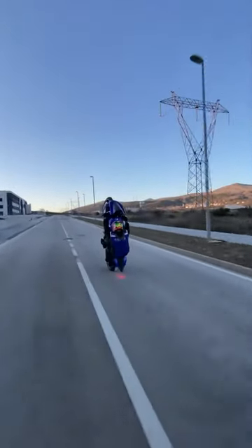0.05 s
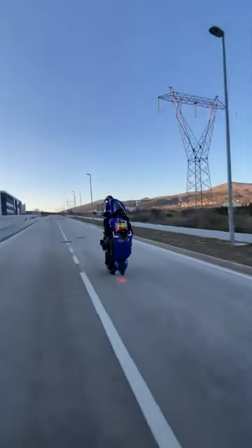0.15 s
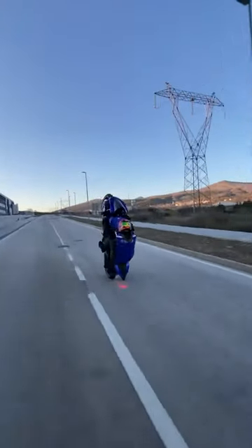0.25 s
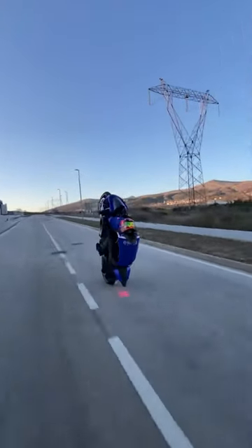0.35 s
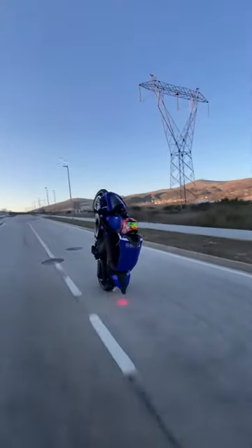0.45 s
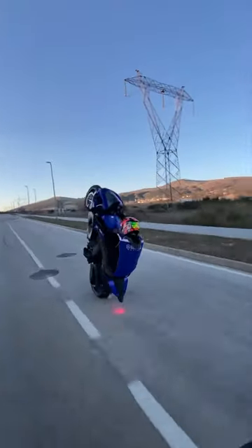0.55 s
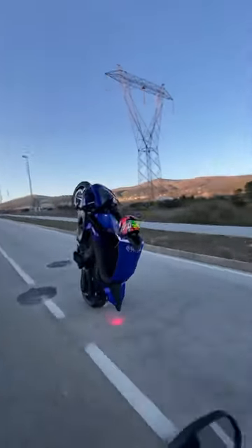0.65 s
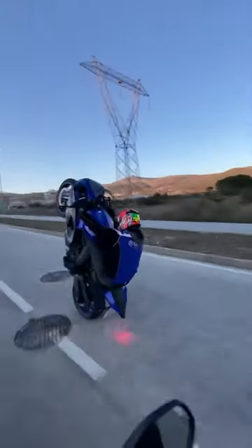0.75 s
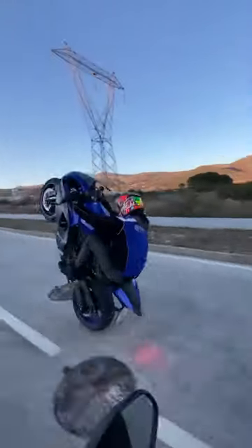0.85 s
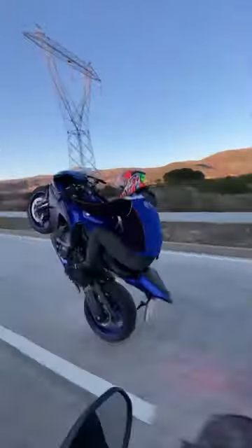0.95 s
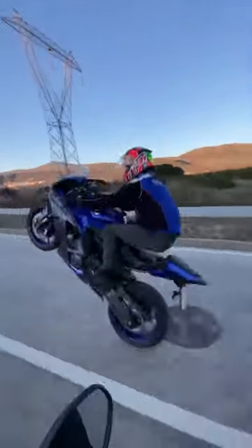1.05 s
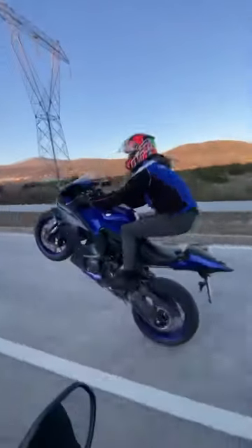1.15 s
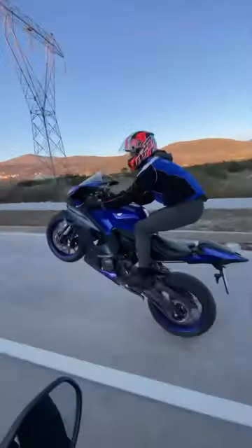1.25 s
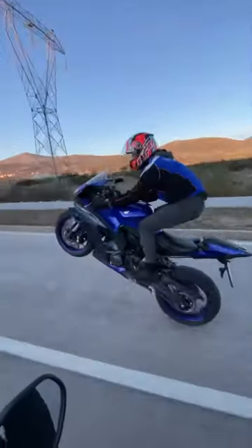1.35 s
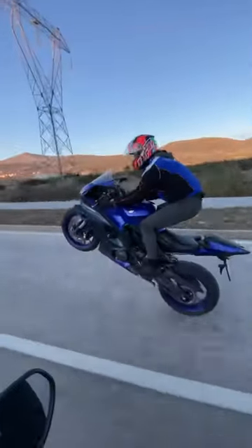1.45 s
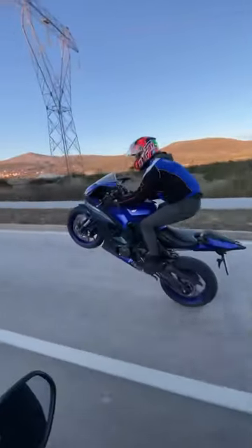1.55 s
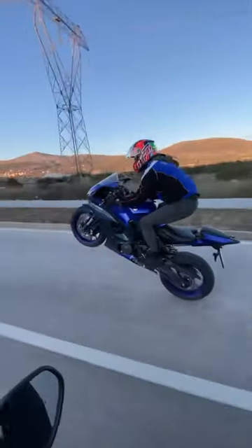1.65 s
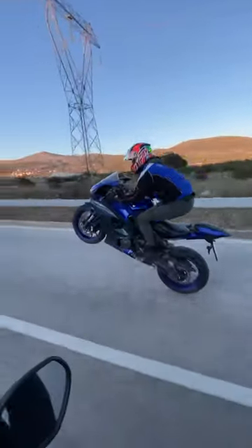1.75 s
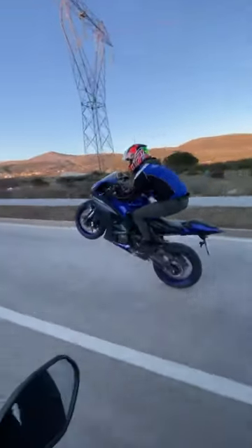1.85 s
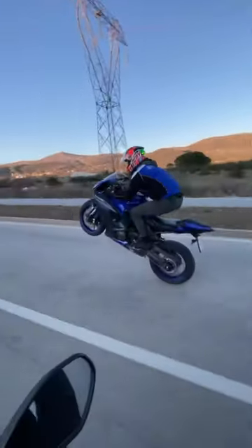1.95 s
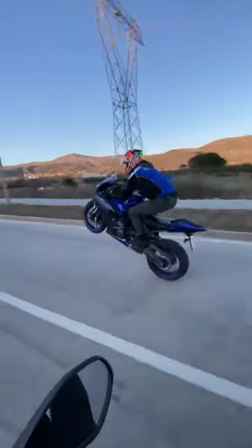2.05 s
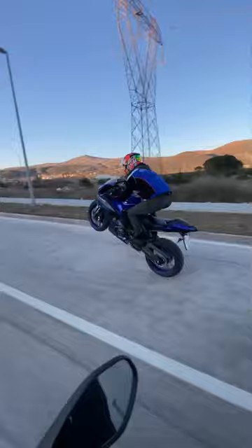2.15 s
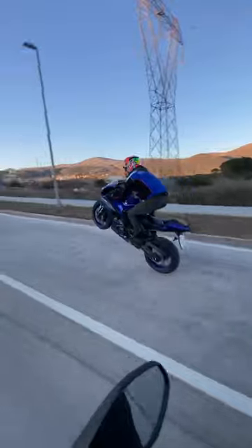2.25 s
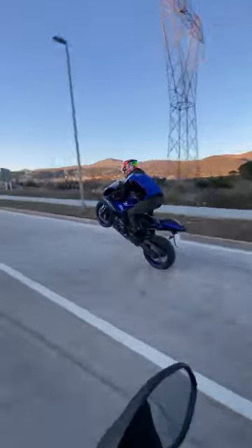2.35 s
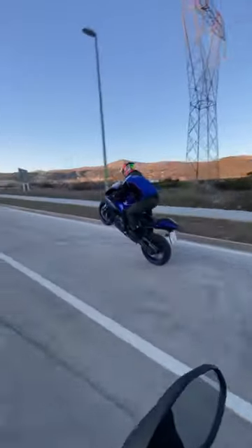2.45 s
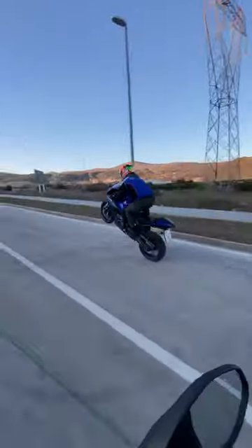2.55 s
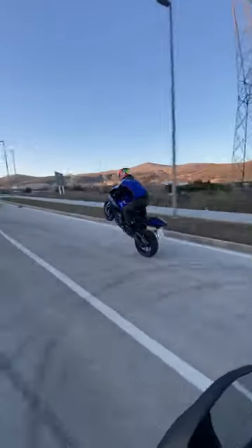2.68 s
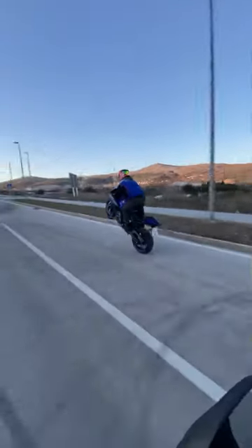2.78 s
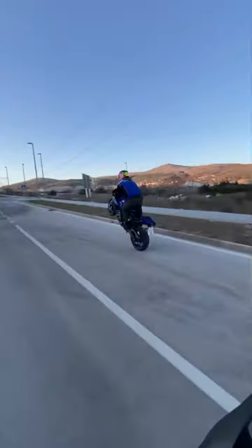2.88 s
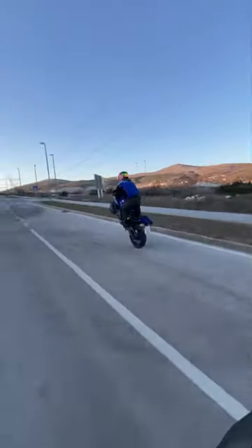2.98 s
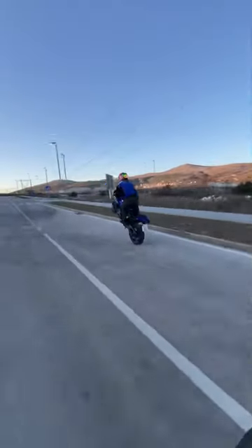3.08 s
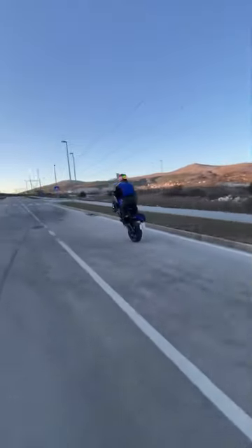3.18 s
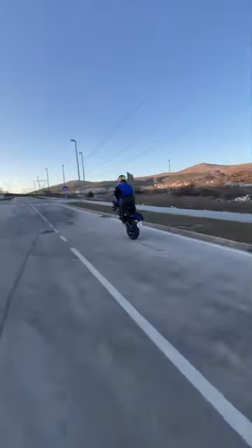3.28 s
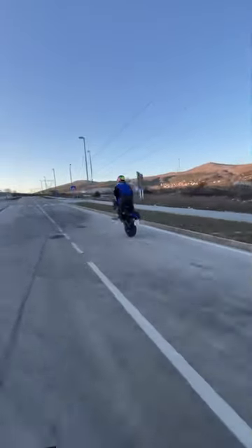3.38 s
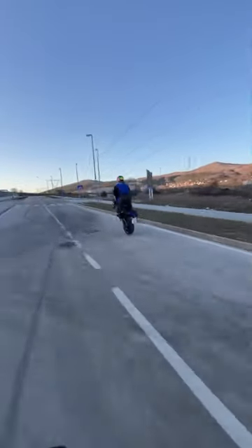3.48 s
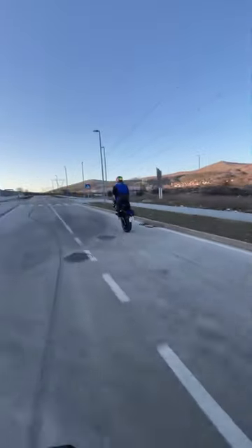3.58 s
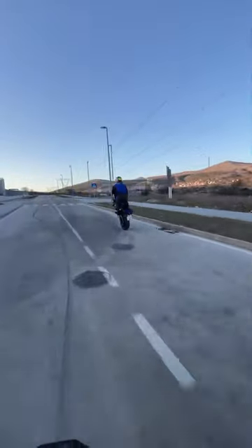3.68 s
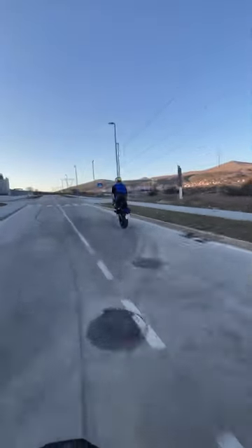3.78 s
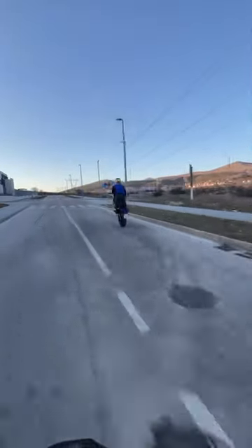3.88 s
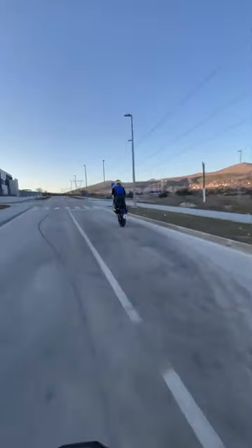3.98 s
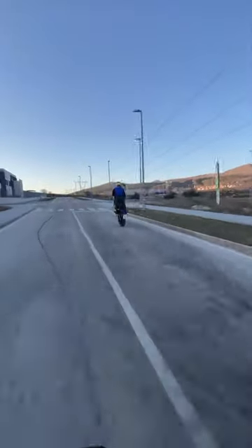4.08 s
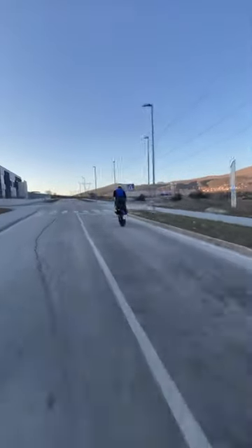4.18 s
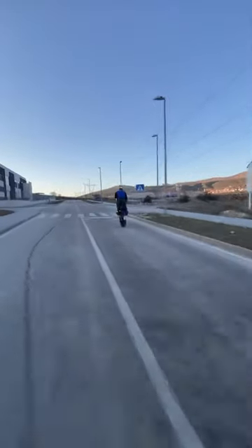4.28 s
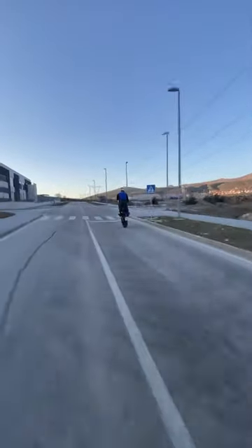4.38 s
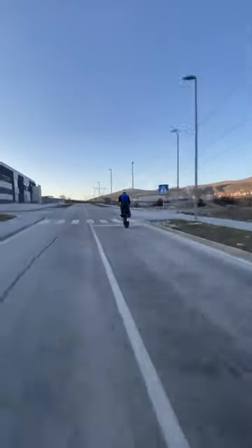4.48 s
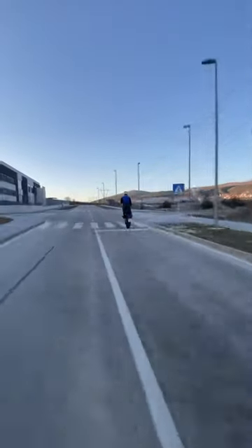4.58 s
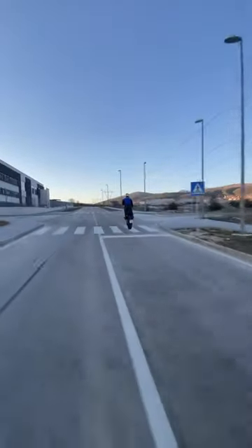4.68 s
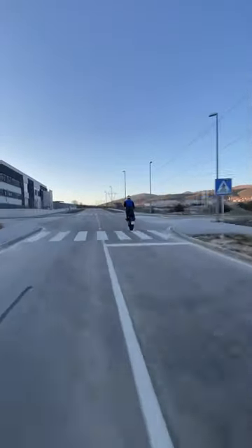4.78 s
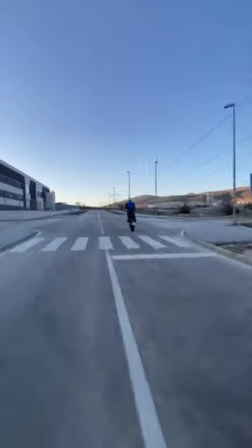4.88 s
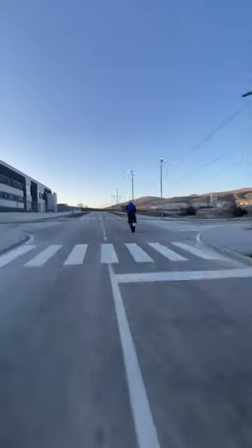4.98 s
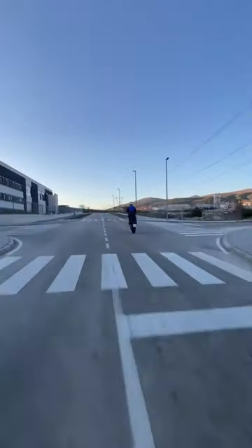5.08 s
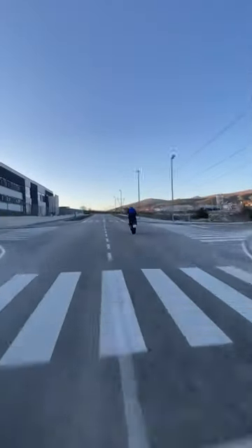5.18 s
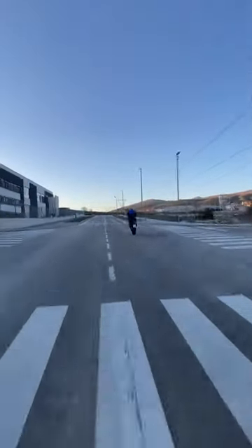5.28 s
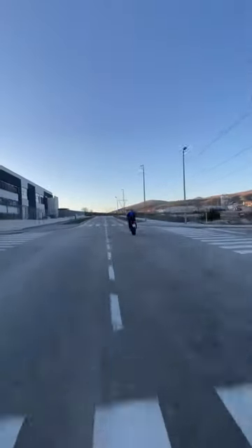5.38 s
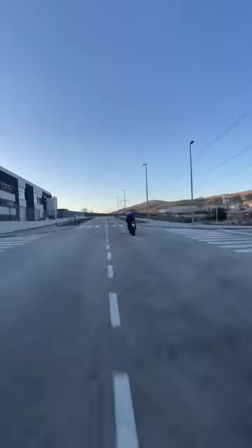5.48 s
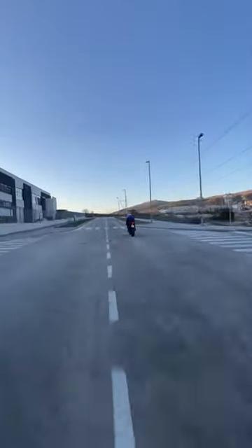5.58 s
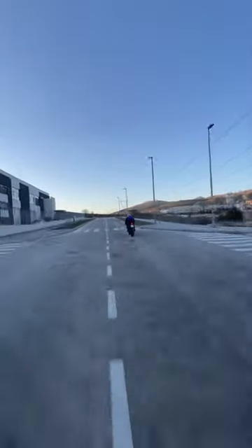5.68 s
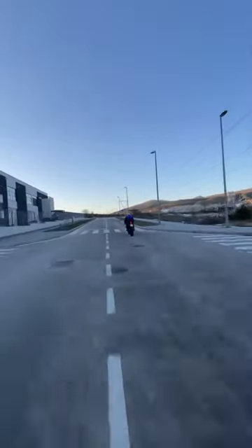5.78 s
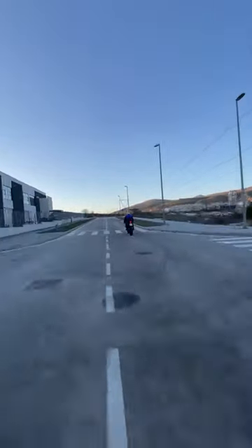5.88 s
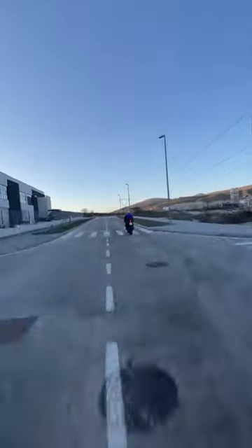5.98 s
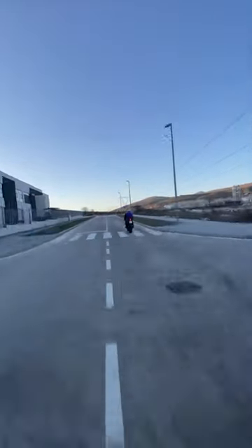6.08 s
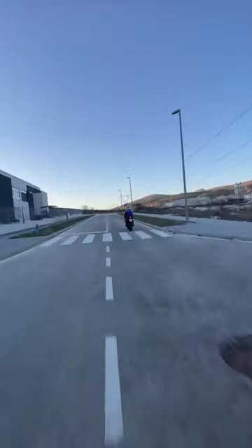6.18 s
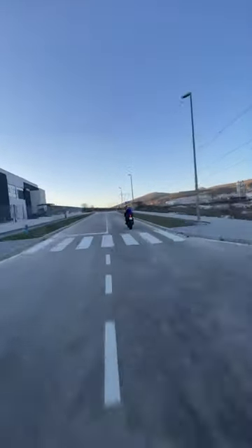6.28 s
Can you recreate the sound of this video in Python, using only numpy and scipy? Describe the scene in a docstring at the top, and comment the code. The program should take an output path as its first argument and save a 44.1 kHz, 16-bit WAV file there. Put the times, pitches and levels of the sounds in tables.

```python
"""Motorcycle ride in gusty wind

A camera rides on a motorcycle; shaped noise with short bursts is the wind on its microphone ports.
Noise opposite in left and right comes in short bursts; engines are sums of multiples that rev up:
the rider's pulls up through a gear, a second bike revs ahead, roar and clatter throb with the first.
A loose metal part jingles as decaying modes. The camera takes its bass from one centre port
and its treble from a left-right pair."""
import sys
import numpy as np
from scipy import signal
from scipy.fft import irfft
from scipy.io import wavfile
from scipy.ndimage import uniform_filter1d

SR = 44100
rng = np.random.default_rng(int(sys.argv[2]) if len(sys.argv) > 2 else 0)


def waveform_to_disk(signal):
    """Save audio, clipped to [-1, 1], as 16-bit WAV at the path in sys.argv[1]."""
    frames = np.transpose(np.atleast_2d(signal))
    scaled = np.clip(frames, -1, 1) * 32767
    samples = np.round(scaled).astype(np.int16)
    wavfile.write(sys.argv[1], SR, samples)


def invert_db(level):
    """Linear amplitude ratio for a level in decibels (20 dB per decade), elementwise."""
    return 10 ** (np.asarray(level, dtype=float) / 20)


N = 279594  # length in samples

# Treble hiss of the air stream, spectrum shape: freq_hz, density_db
HISS_SPECTRUM = [(2500, -15.5), (4500, 0), (5500, 1.5), (6500, -6.5), (8000, -11), (10500, -6),
                 (12000, -9.5), (13500, -23.5), (15500, -35.5)]
# Treble hiss level: time_s, level_db
HISS_LEVEL = [(0, -38), (1.5, -42.5), (2.3, -42.5), (3, -44), (3.8, -44), (4.5, -44.5), (5.4, -40.5),
              (6.34, -50)]

# Low pressure swings, spectrum shape: freq_hz, density_db
RUMBLE_SPECTRUM = [(15, -50), (28, -23.5), (40, -7), (52, 8.5), (72, 1), (120, -4.5), (300, -14.5),
                   (420, -43)]
# Low pressure swings, level before thuds: time_s, level_db
RUMBLE_LEVEL = [(0, -28), (.9, -24), (1.16, -30.5), (1.35, -38.5), (2.06, -29), (2.5, -36.5), (3, -31.5),
                (3.9, -33.5), (4.7, -30.5), (5.85, -26), (6.05, -23.5), (6.34, -24)]
# Heavy thuds of air: centre_s, half_length_s, rise_db
THUDS = [(0.557, 0.092, 8), (0.924, 0.039, 7.5), (3.082, 0.071, 7.5), (3.424, 0.1, 8), (4.459, 0.065, 4)]

# Noise opposite in left and right, spectrum shape: freq_hz, density_db
OPPOSED_SPECTRUM = [(700, 2.5), (1100, 4.5), (1600, -7), (2500, -10), (3300, -13.5), (4200, -22),
                    (6000, -28), (8000, -32), (10000, -44), (15000, -69)]
# Opposed noise, level between bursts: time_s, level_db
OPPOSED_LEVEL = [(0, -33.5), (.47, -31), (.5, -22), (.62, -23), (.76, -28), (.79, -34), (.88, -29),
                 (.92, -21.5), (1.15, -26), (1.2, -29.5), (1.45, -30), (2.05, -29), (2.12, -38), (2.7, -41),
                 (3, -33.5), (3.14, -32), (3.2, -47), (4.3, -48.5), (5.2, -44.5), (6.34, -39)]
# Opposed noise, phase lead of left over right: freq_hz, lead_rad
OPPOSED_LEAD = [(1400, np.pi), (2100, 2.5), (8000, 2.5)]
# Short bursts of noise, opposite in left and right: centre_s, rise_db
SIDE_BURSTS = [(.034, 10), (.066, 10), (.153, 11), (.194, 9), (.292, 9), (.489, 7), (.606, 6), (.902, 11),
               (.928, 6), (1.018, 6), (1.083, 8), (1.115, 8), (1.14, 9), (1.234, 10), (1.31, 8), (1.447, 7),
               (1.56, 8), (1.73, 8), (1.812, 6), (1.849, 7), (1.987, 8), (2.018, 7), (2.076, 8), (2.161, 8),
               (2.202, 9), (2.293, 11), (2.392, 7), (2.502, 11), (2.541, 8), (2.584, 10), (2.626, 9),
               (2.682, 10), (2.757, 8), (2.81, 8), (2.843, 11), (2.889, 8), (2.938, 6), (3.021, 7),
               (3.108, 10), (3.195, 14), (3.31, 11), (3.602, 11), (3.947, 12), (4.062, 15), (4.109, 11),
               (4.154, 11), (4.227, 13), (4.36, 10), (4.73, 11), (5.183, 11), (5.801, 10)]

# Wind strength before the side offset and bursts: time_s, centre_port_db, side_ports_db
GUSTS = [(0, -28, -31.5), (.45, -27, -26), (.55, -24, -30), (.66, -26, -27), (.74, -33, -27.5),
         (.8, -36.5, -45.5), (.87, -32, -30), (.925, -26, -25), (.96, -26.5, -26), (.985, -18.5, -16.5),
         (1.06, -22.5, -21), (1.14, -23.5, -22.5), (1.19, -26.5, -24.5), (1.55, -27.5, -27),
         (2.02, -26, -24.5), (2.035, -38, -32.5), (2.055, -27.5, -30), (2.15, -43.5, -40.5),
         (2.45, -42, -37.5), (2.64, -35.5, -41), (2.7, -32, -32.5), (2.9, -29.5, -30.5), (3.03, -28, -31),
         (3.06, -26, -32.5), (3.135, -24, -30), (3.16, -31.5, -36.5), (3.4, -34, -37), (3.9, -39.5, -40.5),
         (4.2, -33.5, -40), (4.65, -37.5, -40), (4.95, -30, -32), (5.2, -33, -36.5), (5.7, -27, -29.5),
         (6.15, -28.5, -33.5), (6.34, -36, -33.5)]
# Strongest eddies on the ports: centre_s, half_length_s, centre_rise_db, side_rise_db
EDDIES = [(0.036, 0.0035, 6.5, 12), (0.119, 0.005, 9.5, 6.5), (.173, 0.0057, 2, 9),
          (0.356, 0.0022, -2, 2.5), (0.684, 0.007, 15, 6), (0.891, 0.0028, 9.5, 10.5),
          (0.902, 0.0069, 11.5, 15), (.943, 0.007, 9.5, 14.5), (1.015, .005, 2, 1.5),
          (1.14, 0.0054, 2.5, 12.5), (1.234, 0.007, 0.5, 7), (1.718, 0.0043, 4, 5), (1.806, 0.012, 2, 6.5),
          (1.881, 0.0035, 6.5, 5), (2.016, 0.0047, 9.5, 3), (2.077, .012, 6.5, 8.5), (2.121, 0.0046, 10, 4),
          (2.197, 0.02, 11, 8.5), (2.268, 0.0074, 14, 9), (2.289, 0.01, 22, 14), (2.557, 0.0096, 3, -7),
          (2.847, 0.015, -1, 6.5), (3.099, 0.013, 1.5, 7), (3.394, 0.0034, 11.5, 9.5), (4.484, 0.031, 6, 4),
          (5.383, 0.051, 3, 3.5)]
# State of the air flow: time_s, stereo_edge_hz, smoothness_0_to_1, side_port_likeness_0_to_1
FLOW = [(0, 1000, 0, .75), (.6, 1100, 0, .92), (.9, 1200, 0, .8), (2.2, 1220, 0, .8), (3.1, 1170, 0, .8),
        (3.5, 1130, .5, .7), (4.2, 1120, .67, .7), (4.5, 1000, .75, .85), (4.8, 820, .83, .96),
        (5.2, 610, 1, .996), (5.85, 610, 1, .996), (6.34, 780, 1, .996)]
# Wind spectrum shape in ragged flow: freq_hz, density_db
WIND_SPECTRUM = [(40, -23), (170, -1), (300, -2.5), (600, -1), (900, 0.5), (1250, 1.5), (1700, -6),
                 (2500, -10.5), (3300, -16.5), (4200, -19.5), (5500, -25), (7500, -34), (10000, -44.5),
                 (15000, -74.5)]
# Phase lead of left over right in fully smooth flow, and for the hiss: freq_hz, lead_rad
WIND_LEAD = [(1400, np.pi), (2000, 1.03), (2900, 2.67), (4400, 1.77), (5000, 4.16), (5600, 1.9),
             (6400, 0.94), (7700, 2.36), (8600, 1.5)]
# Wind moaning across an edge: centre_s, half_length_s, freq_hz, half_width_hz, rise_db
MOANS = [(.05, .04, 1650, 250, 7), (.6, .12, 1900, 230, 10), (.74, .03, 2200, 150, 8),
         (1.95, .08, 2100, 350, 4)]

# Knocks of the loose metal part: start_s, level_db
JINGLE_KNOCKS = [(.502, -30.5), (.521, -32.5), (.534, -35), (.548, -34), (.565, -38), (.58, -41),
                 (.606, -37), (.617, -38)]
# Its modes, level before a random gain: freq_hz, level_db, t60_s
JINGLE_MODES = [(5630, -8, .025), (8020, -2, .04), (8300, -3, .035), (8600, -5, .02), (9100, -8, .015),
                (10100, -12, .012)]

# Bike ahead, exhaust: time_s, level_db, throttle_0_to_1
AHEAD = [(0, -31.5, 0.01), (.55, -35, 0.2), (.9, -29.5, 0.6), (1.099, -29, 1), (2, -38, 0.7),
         (2.5, -38, 0.9), (3, -38, 0.6), (4.3, -44.5, 0.73)]
# Bike ahead, tone at multiple 1: time_s, pitch_hz
AHEAD_HZ = [(0, 73), (.6, 73), (1.1, 76), (1.5, 85), (2, 101.5), (2.5, 115.5), (3, 127.5), (3.5, 133),
            (4.3, 139.5)]
# Bike ahead, exhaust tones: multiple, pulling_db, coasting_db
AHEAD_TONES = [(1, 2, -8), (1.5, -12, 2), (2, -17.5, -13), (2.5, -14.5, -2.5)]

# Engine clatter and tyre roar, level of the hiss before its throb: time_s, level_db
ROAR_LEVEL = [(0, -32), (.6, -39), (.82, -46), (.95, -39), (1.8, -43), (2.4, -47.5), (3.2, -37),
              (3.9, -37.5), (4.4, -35.5), (4.9, -31), (5.4, -27), (5.6, -28), (5.9, -28.5), (6.34, -30.5)]
# Roar spectrum shape, also shapes the clatter: freq_hz, density_db
ROAR_SPECTRUM = [(950, -41), (1300, -2.5), (2100, -3.5), (2450, -2.5), (2720, 0.5), (2950, -3), (3230, -1),
                 (3550, -5.5), (4050, -7), (4300, -4.5), (4800, -9), (5100, -8.5), (6050, -12), (8000, -18),
                 (10000, -18.5), (12000, -34.5), (15000, -48.5)]
# Roar phase lead of left over right: freq_hz, lead_rad
ROAR_LEAD = [(1400, 3.5), (2070, -1), (2450, 2), (2800, 0.54), (3190, -1), (4390, -3), (5000, -5),
             (5600, -4), (8000, -3.5), (8600, -3)]
# Roar and clatter balance: freq_hz, left_minus_right_db
ROAR_BALANCE = [(1600, 5.5), (2100, -6), (2700, -5), (4000, -2), (4700, -4.5), (6400, -3.5), (7500, 1)]
# Clatter phase lead of left over right: freq_hz, lead_rad
CLATTER_LEAD = [(1400, np.pi), (1900, 0.69), (3500, 1), (5000, 2.9)]
# Gear and chain whine, line level before the roar spectrum: cycle_multiple, line_db
WHINE = [(20, 4), (22, 8), (46, 11), (48, 7), (56, 11), (65, 7), (75, 14), (78, 8), (92, 12)]

# Own engine, exhaust: time_s, level_db, throttle_0_to_1
ENGINE = [(2.2, -46, 1), (2.7, -41, 1), (3.1, -40, 1), (3.5, -40.5, 1), (4.3, -39.5, 1), (4.6, -37, 1),
          (4.9, -34, 1), (5.25, -31, 1), (5.47, -32, 1), (5.56, -33, 0), (5.9, -34, 0), (6.33, -32, 0)]
# Own engine speed: time_s, cycle_hz
ENGINE_HZ = [(2.2, 27.69), (2.45, 29.5), (2.7, 30.3), (3.1, 32.1), (3.5, 33.9), (3.9, 35.5), (4.3, 36.9),
             (4.6, 39.2), (4.9, 41.75), (5.25, 45.25), (5.45, 47.1), (5.65, 48.3), (5.9, 48.7),
             (6.33, 48.09)]
# Own exhaust tones before the silencer resonance: cycle_multiple, pulling_db, coasting_db
ENGINE_TONES = [(1, -9, -2), (2, -1, -1), (3, -1, -2), (4, -7, -11), (5, 2.5, -12), (6, -10, -9),
                (7, -14, -16), (8, -11, -12), (9, -9, -12), (10, -12, -14), (11, -9, -13), (12, -11, -15),
                (13, -8, -18), (14, -11, -18), (15, -14, -18), (16, -16, -20), (17, -21, -28)]

# Gain on what left and right share: freq_hz, gain_db
SHARED_TREBLE = [(8200, 0), (9000, -30), (12000, -30), (14000, -15)]


def evened(x):
    """Scales to rms 1."""
    return x / np.sqrt(np.mean(abs(x) ** 2) + 1e-20)


def over_hz(points, hz):
    """Reads a spectrum on a log-frequency axis, as a column."""
    f, value = np.transpose(points)
    return np.interp(np.log(hz + 1), np.log(f + 1), value)[:, None]


def over_time(rows, t):
    """Reads every column of a curve at the times t."""
    s, *columns = np.transpose(rows)
    return [np.interp(t, s, c) for c in columns]


def bins_and_frames(size):
    """Bin frequencies and frame times of short-time spectra with 75% overlap."""
    hop = size // 4
    return np.fft.rfftfreq(size, 1 / SR), np.arange(N // hop + 5) * hop / SR


def smoothed_twice(x, size):
    """Two moving averages in a row."""
    return uniform_filter1d(uniform_filter1d(x, size=size), size=size)


def lumps(shape, bins, frames):
    """Random patches of unit spread over frequency and time."""
    smeared = uniform_filter1d(rng.standard_normal(shape), bins, 0)
    return evened(uniform_filter1d(smeared, frames, 1))


def bursts(t, s, length, rise_db):
    """Sum of bell-shaped rises in dB."""
    return np.exp(-((t[:, None] - s) / length) ** 2) @ rise_db


def from_spectra(z, size):
    """Short-time spectra back to sound."""
    return signal.istft(z, nperseg=size, noverlap=size * 3 // 4)[1][:, :N]


def ports(gain, lead, likeness, size):
    """Noise at the left, right and centre port; gain is ports x bins x frames."""
    left, other, centre = rng.standard_normal((3, *gain.shape[1:], 2)) @ [1, 1j]
    same = np.clip(likeness, 0, 1)
    right = np.exp(-1j * lead) * (same * left + np.sqrt(1 - same ** 2) * other)
    return from_spectra(gain * [left, right, centre], size)


def air_hiss():
    """Patchy treble noise of air passing the helmet, alike in level at all ports."""
    hz, t = bins_and_frames(size=512)
    field = invert_db(over_hz(HISS_SPECTRUM, hz) + 5.0 * lumps((len(hz), len(t)), bins=6, frames=12))
    hiss = evened(ports(np.array([field] * 3), over_hz(WIND_LEAD, hz), 0.84, size=512))
    return hiss * invert_db(over_time(HISS_LEVEL, np.arange(N) / SR)[0])


def rumble():
    """Lumpy low pressure swings of the air stream, the same at every port, with heavy thuds."""
    hz, t = bins_and_frames(size=2048)
    field = invert_db(over_hz(RUMBLE_SPECTRUM, hz) + 2.2 * lumps((len(hz), len(t)), bins=3, frames=4))
    low = evened(ports(np.array([field] * 3), 0, 1, size=2048)[2])
    t = np.arange(N) / SR
    return low * invert_db(over_time(RUMBLE_LEVEL, t)[0] + bursts(t, *np.transpose(THUDS)))


def opposed_noise():
    """Noise roughly opposite in left and right, in short bursts; none at the centre port."""
    burst_s, flicker_db, patch_db = .008, 1.4, 3.4
    hz, t = bins_and_frames(size=256)
    s, rise_db = np.transpose(SIDE_BURSTS)
    level = over_time(OPPOSED_LEVEL, t)[0] + bursts(t, s, burst_s, rise_db)
    level = level + flicker_db * lumps((1, len(t)), bins=1, frames=5)
    patches = patch_db * lumps((len(hz), len(t)), bins=5, frames=8)
    field = invert_db(over_hz(OPPOSED_SPECTRUM, hz) + level + patches)
    return ports(np.array([field, field, 0 * field]), over_hz(OPPOSED_LEAD, hz), .995, size=256)


def small_eddies(t):
    """Rises of lesser eddies at random times, drawn apart for centre and sides."""
    rate_per_s, length_s = 12., .003
    chance = rng.random((2, len(t)))
    size = np.minimum(rng.exponential(1, (2, len(t))), 3)
    hits = chance < rate_per_s * t[1]  # t[1] is the frame step
    return [bursts(t, t[hit], length_s, big[hit]) for hit, big in zip(hits, size)]


def wind():
    """Turbulence on the ports: ragged, with short eddies that lift all bands at once."""
    tilt_db_per_octave, ragged_db, smooth_ragged_db = -12, 3.3, 1
    small_centre_db, small_side_db, swell_db = 2.5, 3.5, 0.27
    side_offset_db = -5  # side-port level offset, fading out as flow smooths
    hz, t = bins_and_frames(size=256)
    centre_db, side_db = over_time(GUSTS, t)
    _, smooth, likeness = over_time(FLOW, t)

    # smooth flow is duller, less ragged, and thuds less
    tilt_db = tilt_db_per_octave * smooth
    ragged = np.interp(np.sqrt(smooth), [0, 1], [ragged_db, smooth_ragged_db])
    shape = over_hz(WIND_SPECTRUM, hz) + tilt_db * np.log2(np.maximum(hz, 1300) / 1300)[:, None]
    shape += 0.42 * tilt_db * np.log2(450 / np.clip(hz, 150, 450))[:, None]

    s, length, centre_rise, side_rise = np.transpose(EDDIES)
    flicker = lumps((2, len(t)), bins=1, frames=4)
    swell = swell_db * lumps((2, len(t)), bins=1, frames=40)
    small = small_eddies(t)
    centre = centre_db + bursts(t, s, length, centre_rise)
    centre += small_centre_db * small[0] + 0.62 * ragged * flicker[0] + swell[0]
    side = side_db + side_offset_db * (1 - smooth) + bursts(t, s, length, side_rise)
    side += small_side_db * small[1] + 0.75 * ragged * flicker[1] + swell[1]

    patches = 0.24 * ragged * lumps(shape.shape, bins=8, frames=8)
    for at, span, f, width, rise_db in MOANS:
        patches += rise_db * np.exp(-((hz[:, None] - f) / width) ** 2 - ((t - at) / span) ** 2)
    field = shape + patches + np.array([side, side, centre])[:, None]
    lead = over_hz(WIND_LEAD, hz) * (.35 + .65 * smooth)
    return ports(invert_db(field), lead, likeness, size=256)


def jingle():
    """Each knock is a short tick that rings the same high modes, rattling as it dies."""
    knocks, t = np.zeros(N), np.arange(3000) / SR
    lucks = rng.random((len(JINGLE_KNOCKS), len(JINGLE_MODES), 2))
    for (s, db), luck in zip(JINGLE_KNOCKS, lucks):
        ring = 0
        for (hz, mode_db, t60), (gain, phase) in zip(JINGLE_MODES, luck):
            decay = invert_db(mode_db - 60 * t / t60)
            ring = ring + decay * (1.2 + gain) * np.sin(2 * np.pi * (hz * t + phase))
        noise = rng.standard_normal((2, len(t) + 1))
        rattle = 1 + 1.9 * evened(uniform_filter1d(uniform_filter1d(noise[0, 1:], size=40), size=30))
        tick = invert_db(17 - 60 * t / .04) * np.diff(smoothed_twice(noise[1], size=3))
        onset = np.minimum(t / 0.00027, 1)
        knocks[round(s * SR):][:len(t)] += invert_db(db) * (ring * rattle * onset + tick)
    return np.array([knocks, np.roll(knocks, 2), knocks])  # right port 2 samples late


def exhaust(speed, rows, tones, wobble, rough_db):
    """Multiples of the engine's base tone, wavering in speed and strength; also returns its turns."""
    pipe_hz, pipe_width_hz, pipe_db = 530, 110, 4.5  # silencer resonance
    t = np.arange(N) / SR
    hz, level_db, throttle = over_time(speed, t) + over_time(rows, t)
    throttle = np.clip(throttle, 0, 1)
    drift, flutter = lumps((2, N), bins=1, frames=3000)
    turns = np.cumsum(hz * (1 + wobble * drift)) / SR
    tone = 0
    for k, pulling_db, coasting_db in tones:
        resonance_db = pipe_db * np.exp(-((k * hz - pipe_hz) / pipe_width_hz) ** 2)
        strength = invert_db(throttle * pulling_db + (1 - throttle) * coasting_db + resonance_db)
        tone = tone + strength * np.cos(2 * np.pi * (k * turns + .13 * k * k))
    fade_in = np.clip((t - rows[0][0] + 0.18) / 0.41, 0, 1)
    fade_out = np.clip((rows[-1][0] + 0.25 - t) / 0.2, 0, 1)
    return np.sqrt(2) * invert_db(level_db + rough_db * flutter) * fade_in * fade_out * tone, turns


def bike_ahead():
    """Exhaust of the second bike: few tones, uneven in strength."""
    return exhaust(AHEAD_HZ, AHEAD, AHEAD_TONES, wobble=.01, rough_db=3.5)[0]


def clatter(turns):
    """Valves and gears repeat nearly the same knocks in every cycle: many thin wavering lines."""
    lines = np.exp(2j * np.pi * rng.random(257)) * invert_db(4 * rng.standard_normal(257))
    lines[:18], lines[130:] = 0, 0
    k, line_db = np.transpose(WHINE)
    k = k.astype(int)
    lines[k] *= invert_db(line_db) / abs(lines[k])
    slip = .0015 * lumps((1, N), bins=1, frames=2500)[0]  # in cycles
    cycle = irfft(lines, 4096)
    knocks = np.interp((turns + slip) % 1, np.arange(4096) / 4096, cycle, period=1)

    hz, _, z = signal.stft(knocks, SR, nperseg=1024, noverlap=768)
    field = over_hz(ROAR_SPECTRUM, np.maximum(hz, 1300)) + 4 * lumps(z.shape, bins=4, frames=40)
    lean = over_hz(ROAR_BALANCE, hz) / 2
    z = z * invert_db(np.array([field + lean, field - lean, field]))
    z[1] *= np.exp(-1j * over_hz(CLATTER_LEAD, hz))

    t = np.arange(N) / SR
    fade_in = np.clip((t - ENGINE[0][0]) / 0.36, 0, 1)
    pulling = fade_in * (.5 + .5 * over_time(ENGINE, t)[1])
    return evened(from_spectra(z, 1024)) * pulling


def roar(turns):
    """Hiss shaped by the fairing and the ground, throbbing with two uneven firings a cycle."""
    clatter_db = -3  # the part that repeats every cycle
    hz, t = bins_and_frames(size=1024)
    # narrow resonances of the bodywork come and go
    ripple = 1.6 * lumps((len(hz), len(t)), bins=2, frames=110)
    field = over_hz(ROAR_SPECTRUM, hz) + ripple + 1.08 * lumps(ripple.shape, bins=12, frames=10)
    lean = over_hz(ROAR_BALANCE, hz) / 2
    gain = invert_db(np.array([field + lean, field - lean, field]))
    hiss = evened(ports(gain, over_hz(ROAR_LEAD, hz), 0.57, size=1024))
    throb = 1 + 0.29 * (np.exp(-(turns % 1) / 0.15) + np.exp(-((turns - .375) % 1) / 0.041))
    level = invert_db(over_time(ROAR_LEVEL, np.arange(N) / SR)[0])
    return (hiss * throb + invert_db(clatter_db) * clatter(turns)) * level


def own_engine():
    """The rider's engine: exhaust multiples, plus roar and clatter locked to its cycle."""
    tone, turns = exhaust(ENGINE_HZ, ENGINE, ENGINE_TONES, wobble=.002, rough_db=1.5)
    return tone + roar(turns)


def camera(left_right_centre):
    """Cross-fades from the centre port below the stereo edge to the side ports above it."""
    hz, t, (left, right, centre) = signal.stft(left_right_centre, SR, nperseg=1024, noverlap=768)
    step = np.clip((hz[:, None] / over_time(FLOW, t)[0] - .6) / 0.85, 0, 1)
    stereo = np.sin(np.pi / 2 * step) ** 2
    shared = invert_db(over_hz(SHARED_TREBLE, hz)) * (left + right) / 2
    mid = stereo * shared + (1 - stereo) * centre
    mid *= np.clip(hz[:, None] / 48, 0, 1) ** 2  # low cut
    side = stereo * (left - right) / 2
    return from_spectra(np.array([mid + side, mid - side]), 1024)


def scene():
    """Everything that reaches the three ports, whose preamplifiers round off the peaks."""
    mount_db = -17  # share of the jingle through the camera mount
    knocks = jingle()
    air = air_hiss() + rumble() + opposed_noise() + wind() + knocks + bike_ahead() + own_engine()
    return camera(np.tanh(air)) + invert_db(mount_db) * knocks[2]


def band_limit(x):
    """A steep low-pass at the top of the band."""
    return signal.sosfilt(signal.butter(12, 15760, fs=SR, output="sos"), x)


def record(dry):
    """Delivers the finished mix."""
    return band_limit(dry)


dry = scene()
out = record(dry)
waveform_to_disk(out)
```